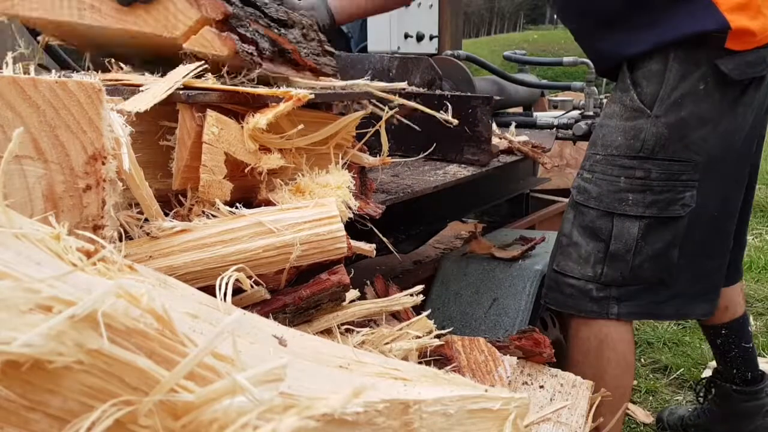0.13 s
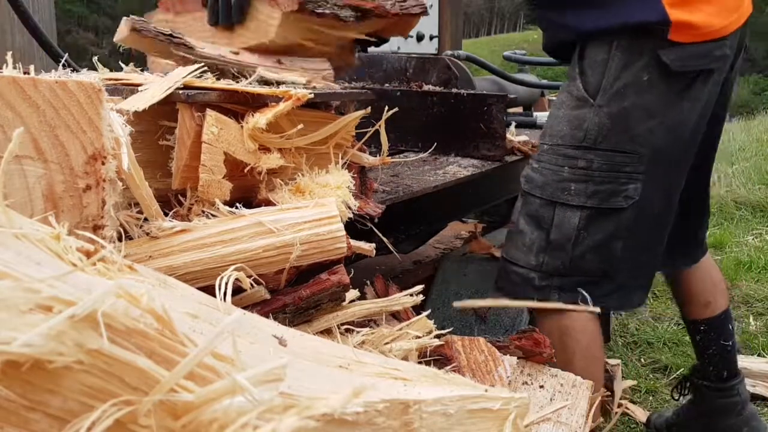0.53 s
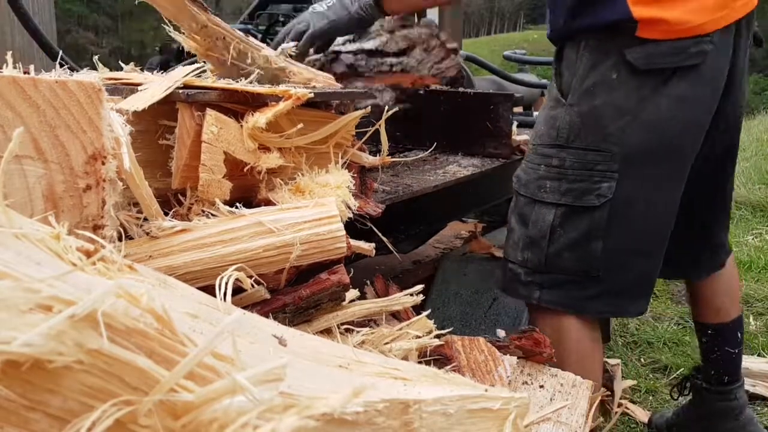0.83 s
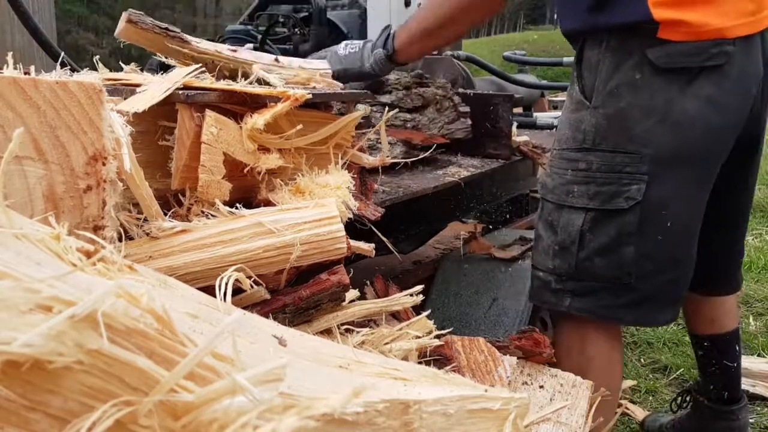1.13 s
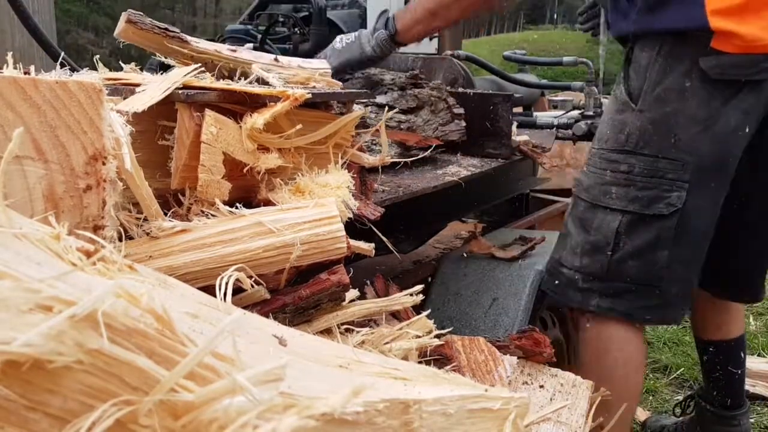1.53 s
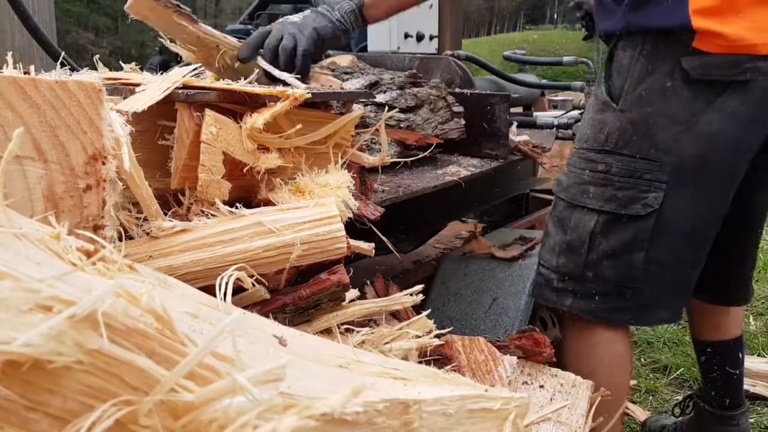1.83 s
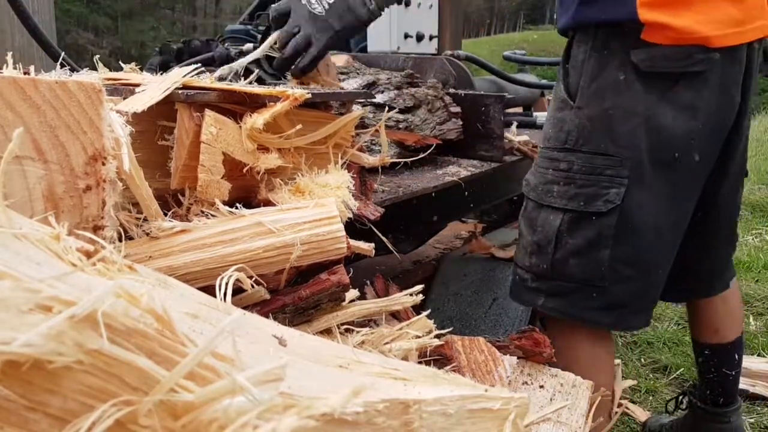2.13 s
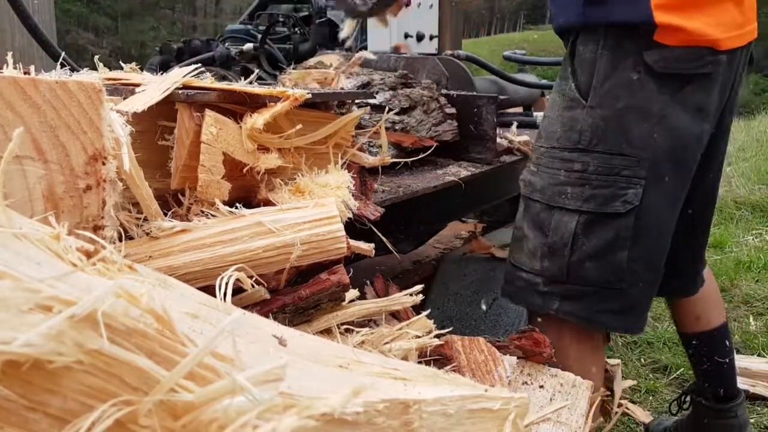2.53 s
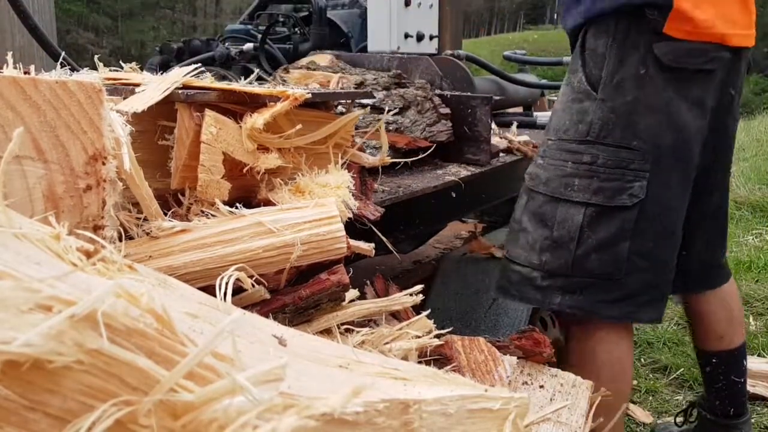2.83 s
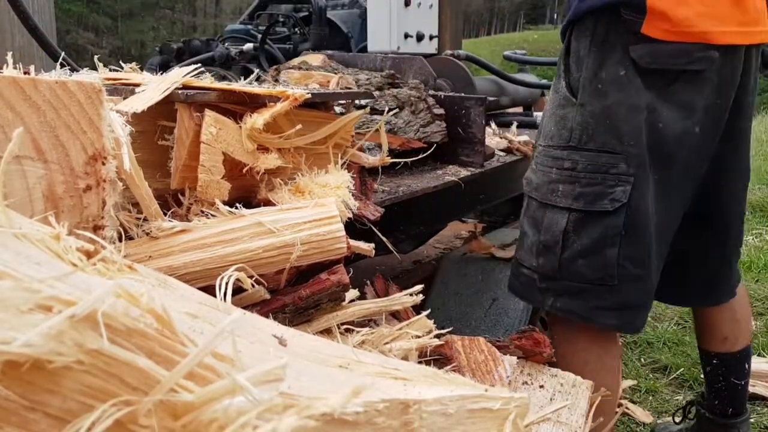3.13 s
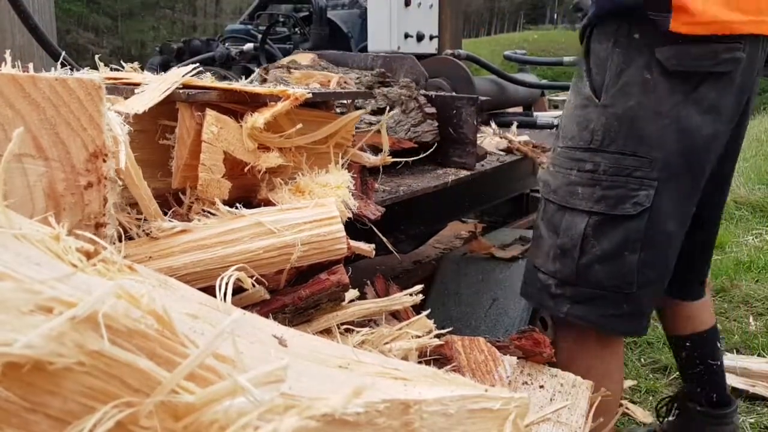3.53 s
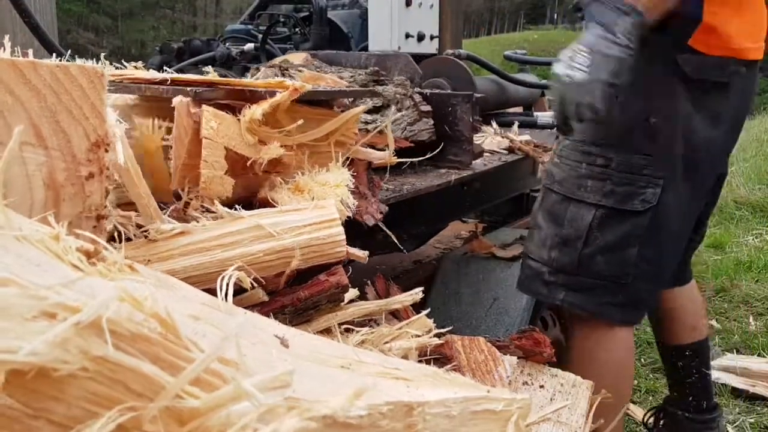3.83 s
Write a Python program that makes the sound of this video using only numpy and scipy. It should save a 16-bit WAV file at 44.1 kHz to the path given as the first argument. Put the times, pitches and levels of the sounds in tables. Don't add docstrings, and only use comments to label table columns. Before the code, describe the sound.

A small engine drones with rattling valves and hydraulic whine outdoors; wood splinters and a log bounces on a steel table, the engine runs alone, then smaller pieces knock down as the whine flares. Close stereo microphone.

```python
import sys
import numpy as np
from scipy import signal
from scipy.io import wavfile

SR = 44100
rng = np.random.default_rng(int(sys.argv[2]) if len(sys.argv) > 2 else 0)


def makeup_ratio(level_db):
    decades = np.asarray(level_db, float) / 20
    return 10 ** decades


def bounce(signal):
    frames = np.transpose(np.atleast_2d(signal))
    limited = np.clip(frames, -1, 1)
    pcm = np.round(limited * 32767).astype(np.int16)
    wavfile.write(sys.argv[1], SR, pcm)


N = 175959
T = np.arange(N) / SR
VALVE_OPENS_S = 3.5


def in_time(rows):
    return np.interp(T, *np.transpose(rows))


def at_hz(points, hz):
    x, y = np.array(points).T
    return np.interp(np.log(hz), np.log(x), y)


def rms_one(x):
    return x / np.sqrt(np.mean(x ** 2) + 1e-20)


def drift(rate):
    r = np.exp(-80 * np.pi * rate / SR)
    slow = signal.lfilter([1], [1, -2 * r, r * r], rng.standard_normal(N // 40 + 2002))
    slow = rms_one(slow[2000:])
    return np.interp(np.arange(N) / 40, np.arange(len(slow)), slow)


def band(x, low_hz, high_hz):
    sos = signal.butter(2, [low_hz, min(high_hz, .45 * SR)], "band", fs=SR, output="sos")
    return signal.sosfilt(sos, x)


def ring(clicks, hz, t60):
    r, w = makeup_ratio(-60 / (t60 * SR)), 2 * np.pi * hz / SR
    return signal.lfilter([0, np.sin(w)], [1, -2 * r * np.cos(w), r * r], clicks + 1e-18)


def placed(x, lean_db):
    return x * makeup_ratio(lean_db / 2 * np.array([[1], [-1]]))


# (frequency [Hz], left over right [dB])
LEANING = [(50, -13.5), (130, 5.5), (500, 3.5), (1000, -0.5), (2000, 7.5), (4000, 1.8), (8000, 2),
           (12000, 17)]


def engine_lean(hz):
    return at_hz(LEANING, hz)


# (frequency [Hz], likeness [-1 to 1])
LIKENESS = [(100, -1), (500, 1), (1000, 0.23), (2000, 0.1), (4000, -0.22), (8000, -0.13)]


def banded_noise(spectrum, patchy_db):
    low_hz, high_hz = spectrum[0][0], spectrum[-1][0]
    edges = np.geomspace(low_hz, high_hz, int(3 * np.log2(high_hz / low_hz)) + 3)
    white, together = rng.standard_normal((2, 2, N)), drift(12)
    out = 0
    for k, (low, high) in enumerate(zip(edges, edges[1:])):
        mid, side = band(white[k % 2], low, high)
        hz = np.sqrt(low * high)
        alike = np.clip(at_hz(LIKENESS, hz), -1, 1)
        pair = np.sqrt(1 + alike) * mid + np.sqrt(1 - alike) * side * [[1], [-1]]
        flicker_db = patchy_db * (0.36 * together + drift(36))
        out = out + makeup_ratio(at_hz(spectrum, hz) + flicker_db) * placed(pair, engine_lean(hz))
    return rms_one(out)


# (time [s], firings per second [Hz])
SPEED = [(0.0, 59.54), (0.5, 59.67), (0.85, 59.41), (1.05, 60.94), (1.25, 60.45), (1.7, 60.19),
         (2.2, 60.22), (2.7, 60.2), (3.1, 60.25), (3.35, 60.21), (3.5, 59.98), (3.62, 58.51), (3.72, 58.02),
         (3.85, 58.54), (3.99, 59.21)]


def engine_turn():
    return -.037 + np.cumsum(in_time(SPEED)) / 3 / SR


# (time [s], share of full load [0-1])
LOAD = [
    (0, 0.91),
    (.92, 0.69),
    (1.12, 0),
    (3.42, 0),
    (3.64, 0.64),
    (3.99, .99),
]


def engine_load():
    return in_time(LOAD)


# (multiple of the cycle rate [-], level [dB])
EXHAUST = [(1, -48), (2, -49), (3, -17), (4, -22.5), (5, -51), (6, -0.5), (7, -16), (8, -24.5), (9, -1.5),
           (10, -9.5), (11, -20.5), (12, -5.5), (13, -21.5), (14, -29), (15, -21), (16, -23.5), (17, -32.5),
           (18, -11.5), (19, -24), (20, -26.5), (21, -21.5), (22, -49), (23, -50), (24, -22.5), (25, -21.5),
           (26, -24), (27, -19.5), (28, -19), (29, -27), (30, -17.5), (31, -22), (32, -28), (33, -32),
           (34, -31), (35, -20.5), (36, -24), (37, -33), (38, -24.5), (39, -23), (40, -31.5), (41, -33),
           (42, -33.5), (43, -18.5), (44, -23.5), (45, -46)]
# (multiple of the cycle rate [-], change [dB])
LOADED = [(1, -12), (3, -7.5), (5, 7), (6, 5), (9, 4.5), (12, 3), (15, 0), (18, 1), (30, 2.5), (44, 3)]


def exhaust(turn, load):
    EXHAUST_DB, SPREAD_RAD, UNEVEN_RAD, WOBBLE_DB = 11, 4.5, 0.99, 0.8
    PULSE_TURN, LEFT_LEADS_S = .148, 0.0003
    out, wobble = np.zeros((2, N)), [drift(6.0) for _ in range(4)]
    lead = LEFT_LEADS_S * np.gradient(turn) * SR * np.array([[.5], [-.5]])
    for (k, db), chance in zip(np.round(EXHAUST), rng.random(len(EXHAUST))):
        if k < 19:
            phase = -SPREAD_RAD * np.log(k / 9) ** 2 + UNEVEN_RAD * (k % 3)
        else:
            phase = 2 * np.pi * chance
        level = EXHAUST_DB + db + load * at_hz(LOADED, k)
        level = level + WOBBLE_DB * np.sqrt(k / 6) * wobble[int(k) % 4]
        angle = 2 * np.pi * k * (turn - PULSE_TURN + lead * min(1, 9 / k)) + phase
        out += placed(makeup_ratio(level) * np.sqrt(2), engine_lean(20 * k)) * np.cos(angle)
    return out


# (place in the cycle [0-1], ring [Hz], level [dB], t60 [s])
TAPS = [(.14, 2900, 5.5, 0.031), (.47, 2620, 4.5, 0.033), (.15, 2800, 6.5, 0.02), (.48, 3100, 1.5, 0.03),
        (0.18, 3850, 4.5, 0.0081), (.48, 3970, 0.5, 0.023), (0.92, 3800, -2, 0.03), (.64, 2100, -2, 0.014)]


def taps(turn, load):
    TAP_DB, TAP_SCATTER_DB = 5, 1.2
    LOAD_TIGHTENS = 0.022
    out = np.zeros((2, N))
    for share, hz, db, t60 in TAPS:
        hit = np.diff(np.floor(turn - share), prepend=0) > 0
        clicks = hit * makeup_ratio(TAP_DB + db + TAP_SCATTER_DB * rng.standard_normal(N))
        burst = signal.lfilter([1], [1, -.97], np.abs(clicks)) * rng.standard_normal((2, N)) * .12
        strike = clicks + burst
        idle = ring(strike * (1 - load), hz, t60)
        tight = ring(strike * load, hz * (1 + LOAD_TIGHTENS), t60)
        out += placed(idle + tight, engine_lean(hz)) / 2
    return out


# (frequency [Hz], level per Hz [dB])
CLATTER = [(250, -6.5), (440, -16), (580, -7.5), (870, -7), (1050, -12), (2850, -14.5), (4300, -23),
           (8300, -33)]
# (place in the cycle [0-1], puff level [dB])
FIRINGS = [
    (.14, 2.2),
    (0.467, -4),
    (0.802, -2),
]


def clatter(turn):
    CLATTER_DB, RUMBLE_DB, STRAIN_DB = 5.5, -9, 0.5
    PUFF_TURNS = 0.043
    puffs = sum(makeup_ratio(db) * np.exp(-((turn - share) % 1) / PUFF_TURNS) for share, db in FIRINGS)
    casing = rms_one(banded_noise(CLATTER, patchy_db=1.0) * (1 + puffs * makeup_ratio(0.32 * drift(11.0))))
    strain = np.clip((T - VALVE_OPENS_S) / 0.13, 0, 1)
    rumble = placed(rms_one(band(rng.standard_normal(N), 46, 234)), 6.6)
    return makeup_ratio(CLATTER_DB + STRAIN_DB * strain) * casing + makeup_ratio(RUMBLE_DB) * rumble


# (frequency [Hz], level per Hz [dB])
FAN = [(9500, 2.5), (10500, 3), (12500, -3.5), (14500, -1.5), (15500, 7)]
# (time [s], level [dB])
SHADE = [(0, -2.5), (.8, -1), (1.2, 1), (2.5, 0.5), (2.56, 2.5), (3.99, 4)]


def fan(turn):
    FAN_DB, FAN_THROB_DB = -13.5, 2.5
    throb = FAN_THROB_DB * np.cos(2 * np.pi * (6 * turn + 0.42))
    return makeup_ratio(FAN_DB + in_time(SHADE) + throb) * banded_noise(FAN, patchy_db=1.1)


# (multiple of the cycle rate [-], level at full load [dB])
PUMP = [(24, 4), (48, -6.5), (72, -8), (82, -11), (94, -13), (120, -14)]


def pump(turn, load):
    SURGE_LENGTH_S, SURGE_DB = 0.77, 10
    FLARE_S, FLARE_WIDTH_S, FLARE_DB = 3.572, 0.029, 9
    PIPE_HZ, PIPE_DB = 2502, -5.5
    since = np.maximum(T - VALVE_OPENS_S, 0)
    settled = SURGE_DB * np.exp(-since / SURGE_LENGTH_S) * np.minimum(1, since / 0.022)
    surge = settled + FLARE_DB * np.exp(-((T - FLARE_S) / FLARE_WIDTH_S) ** 2)
    opened = np.clip(load + since * 20, 0, 1)
    teeth = 0
    for k, db in np.round(PUMP):
        if k == 48:
            push = opened * makeup_ratio(surge)
        else:
            push = load * makeup_ratio(settled * (.4 if k < 48 else -1))
        teeth = teeth + push * makeup_ratio(db + 2.5 * drift(1.8)) * np.sin(2 * np.pi * k * turn)
    pipe = np.sin(2 * np.pi * PIPE_HZ * T + 0.2 * drift(6.7))
    pipe = load * makeup_ratio(PIPE_DB - settled) * makeup_ratio(0.99 * drift(16.0)) * pipe
    return placed(teeth + pipe, 6.2)


# (time [s], level [dB], centre [Hz], length [s], bright sizzle [dB])
CRACKS = [(.813, 7, 2640, 0.0086, -28), (0.826, 12, 3600, 0.0094, -12.5), (.838, 18, 1430, .012, -12.5),
          (0.843, 9, 2300, .012, -19), (.858, 12.5, 1400, 0.016, -14), (0.87, -1, 2600, .01, -21),
          (0.891, 12.5, 985, 0.047, -18), (0.908, 12, 1370, 0.03, -12), (.921, 10, 3350, 0.0073, -23),
          (0.927, 11, 2570, .008, -11), (0.9526, 18.5, 1960, 0.0037, -18), (0.988, 3, 2280, 0.013, -15),
          (0.997, 12, 1860, 0.017, -20), (1.013, 0, 2530, 0.0082, -14), (2.543, -3, 14000, .03, -30),
          (3.375, 8.5, 1970, 0.011, -26), (3.42, 6, 1800, 0.01, -27), (3.541, 9, 2750, .006, -25),
          (3.652, 0, 5500, 0.026, -30), (3.7072, 20.5, 2500, 0.0028, -22), (3.729, 6, 3400, 0.0053, -27),
          (3.749, 9, 3000, .002, -13), (3.851, 15.5, 2390, 0.0018, -14), (3.861, 11, 2500, 0.0022, -26)]


def cracks():
    CRACK_OCTAVES, SPLINTERS_PER_S = 0.99, 3000
    out, t = np.zeros((2, N + SR)), np.arange(SR // 5) / SR
    for s, db, hz, length, sizzle_db in CRACKS:
        i = int(s * SR)
        splinters = rng.random(len(t)) < SPLINTERS_PER_S / SR
        grains = rng.standard_normal((2, len(t))) * (0.5 + splinters * 3.1)
        grains[:, 30] += 7.0
        grains[1] = 0.2 * grains[0] + 0.5 * grains[1]
        body = rms_one(band(grains, hz / 2 ** CRACK_OCTAVES, hz * 2 ** (CRACK_OCTAVES / 2)))
        shower = body + makeup_ratio(sizzle_db) * rms_one(band(grains, 4500, 15000))
        out[:, i:i + len(t)] += makeup_ratio(db) * shower * np.exp(-t / length) * np.minimum(1, t / .0006)
    return placed(out[:, :N], 1.5)


# (delay [s], level [dB])
ECHOES = [
    (.011, -7),
    (.023, -10.5),
]


def with_echoes(wood):
    dull = band(wood, 275, 1940)
    for k, (s, db) in enumerate(ECHOES):
        sides = dull[::(-1) ** (k + 1)]
        wood = wood + makeup_ratio(db) * np.roll(sides, int(s * SR), axis=1)
    return wood


def knocks(blows, modes):
    WOOD_DB, WOOD_SCATTER_DB = -5, 1.8
    DETUNE, RATTLE_S = .012, .003
    out, t = np.zeros(N + SR), np.arange(SR // 4) / SR
    for s, db, length in blows:
        for hz, level_db, t60 in modes:
            d, e = rng.standard_normal(2)
            push = (t == 0) + .03 * rng.standard_normal(len(t)) * np.exp(-t / RATTLE_S)
            height = makeup_ratio(WOOD_DB + db + level_db + WOOD_SCATTER_DB * d)
            out[int(s * SR):][:SR // 4] += height * ring(push, hz * (1 + DETUNE * e), t60 * length)
    return out[:N]


# (time [s], peak level [dB], length factor [-])
CLACKS = [
    (.828, 15.5, 0.85),
    (.855, 8, .8),
]
# (frequency [Hz], level [dB], t60 [s])
STEEL = [(600, 7, 0.068), (1350, -5, .07), (1730, -2, 0.077), (2230, -10, 0.042), (2945, -5, .06)]


def steel_clacks():
    return knocks(CLACKS, STEEL)


# (time [s], peak level [dB], length factor [-])
LOG_KNOCKS = [
    (.953, 23.5, 1.26),
    (.968, 20, 1.04),
    (.979, 13, 0.43),
    (.991, 18.5, 1.1),
    (1.003, 11, 0.93),
    (1.016, 2, 0.66),
    (1.028, 11.5, 0.72),
]
# (frequency [Hz], level [dB], t60 [s])
LOG = [(373.7, 3.5, 0.136), (503, 1, 0.055), (645, 1, 0.099), (748, -1.5, .05), (840, 2, 0.049),
       (1035, -5.5, 0.055), (1293, -8, 0.075)]


def log_drop():
    return knocks(LOG_KNOCKS, LOG)


# (time [s], peak level [dB], length factor [-])
PIECE_KNOCKS = [
    (3.422, 24, 0.97),
    (3.43, 14, 0.48),
    (3.437, 14, 0.93),
]
# (frequency [Hz], level [dB], t60 [s])
PIECE = [(304, 1.5, 0.09), (528, 1, 0.05), (640, -0.5, 0.041), (770, -1.5, 0.029), (960, -8, 0.026),
         (1210, -1.5, 0.058), (1280, -7, 0.08), (1830, -2, 0.028), (2250, -6, 0.043)]


def piece_set_down():
    return knocks(PIECE_KNOCKS, PIECE)


def oil():
    hiss = rms_one(band(rng.standard_normal((2, N)), 5700, 10700))
    return makeup_ratio(-9) * np.clip((T - VALVE_OPENS_S) / 0.2, 0, 1) * placed(hiss, 4.9)


# (time [s], peak level [dB], length factor [-])
SLAT_KNOCKS = [
    (3.546, 21, 1.0),
    (3.556, 19, 1.0),
    (3.578, 15, .7),
    (3.607, 11, 0.42),
]
# (frequency [Hz], level [dB], t60 [s])
SLAT = [(350, 8, 0.03), (1068, -1.5, 0.055), (614, -5, .04), (1237, -1, 0.12), (1380, -10, .06),
        (1984, -7, 0.055), (2500, -5, 0.068), (2910, -9, 0.036)]


def slat_rocking():
    return knocks(SLAT_KNOCKS, SLAT)


# (time [s], peak level [dB], length factor [-])
CHIP_KNOCKS = [
    (3.656, 11, 1.0),
    (3.874, 14, 0.63),
]
# (frequency [Hz], level [dB], t60 [s])
CHIP = [(1990, -2, .05), (2095, 0.5, .06)]


def chip_ticks():
    return knocks(CHIP_KNOCKS, CHIP)


def scene():
    turn, load = engine_turn(), engine_load()
    engine = exhaust(turn, load) + taps(turn, load) + clatter(turn) + fan(turn)
    hydraulics = pump(turn, load) + oil()
    blows = steel_clacks() + log_drop() + piece_set_down() + slat_rocking() + chip_ticks()
    wood = cracks() + placed(band(blows, 163, 6000), 6.4)
    return 0.031 * (engine + hydraulics + with_echoes(wood))


# (time [s], level [dB])
GAIN = [(0, -30.5), (.8, -30), (.98, -31), (1.08, -33.5), (1.27, -35), (1.6, -36), (2.0, -36), (2.3, -32),
        (2.6, -29), (3.0, -29.5), (3.4, -29), (3.6, -29.5), (3.99, -32.5)]


def automatic_gain(dry):
    return dry / 0.029 * makeup_ratio(in_time(GAIN))


def low_pass(x):
    return signal.sosfilt(signal.butter(12, 15060, fs=SR, output="sos"), x)


def record(dry):
    x = np.tanh(automatic_gain(dry) / 1.106) * 1.104
    treble_notch = signal.butter(1, (7700, 10500), "bandstop", fs=SR, output="sos")
    top_cut = signal.ellip(10, 1, 55, 14620, fs=SR, output="sos")
    x = signal.sosfilt(top_cut, signal.sosfilt(treble_notch, x))
    return low_pass(x)


dry = scene()
out = record(dry)
bounce(out)
```